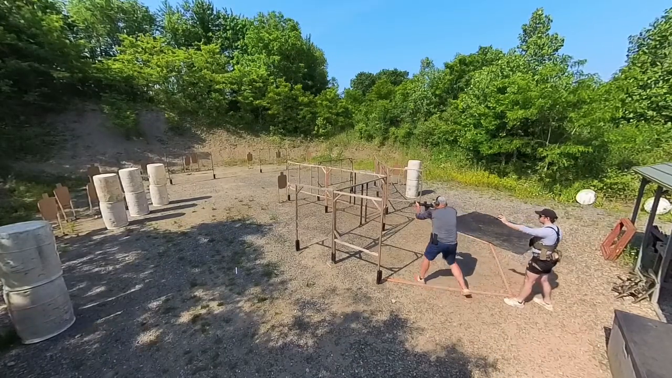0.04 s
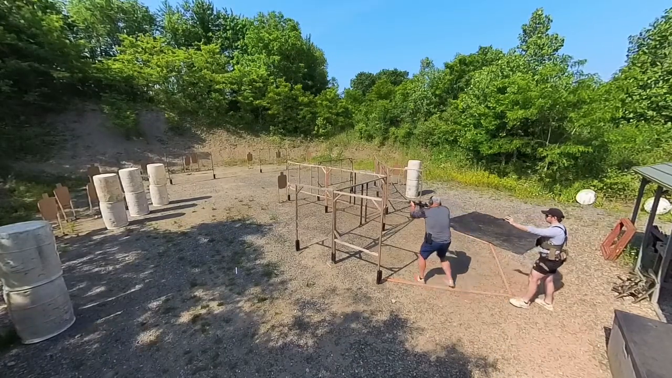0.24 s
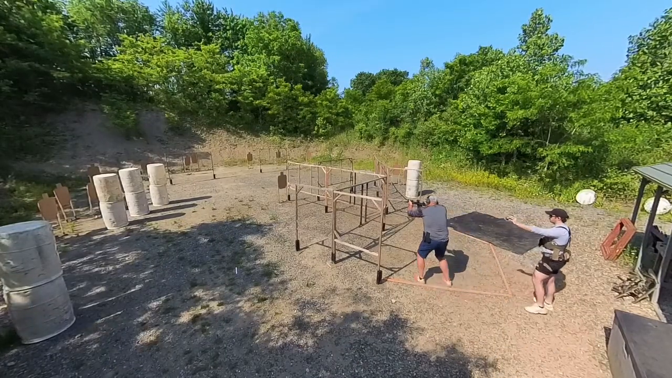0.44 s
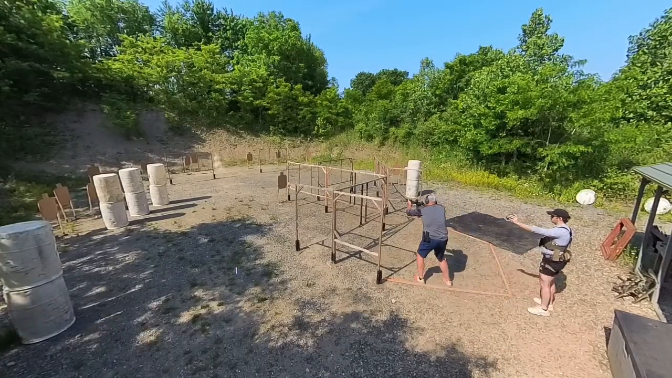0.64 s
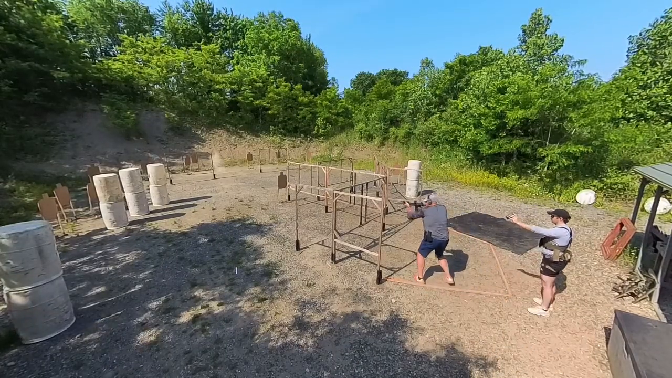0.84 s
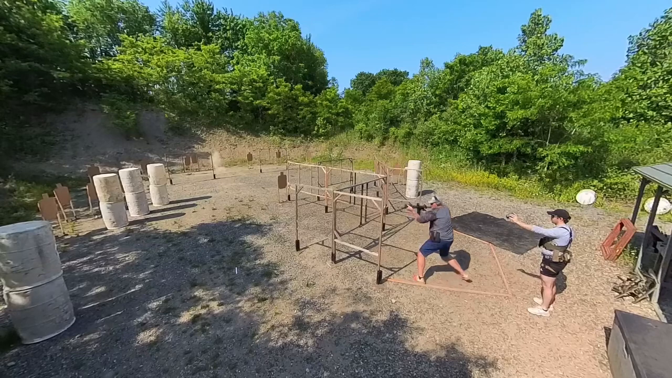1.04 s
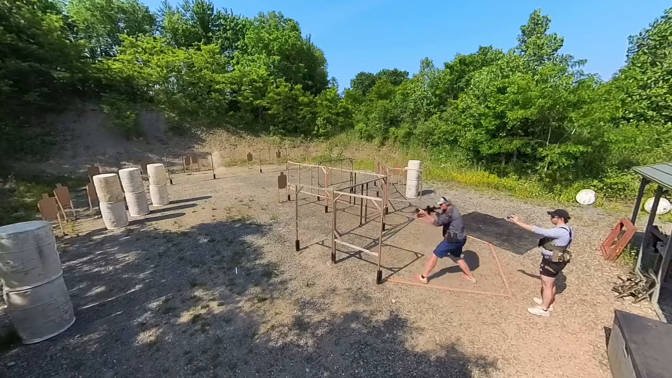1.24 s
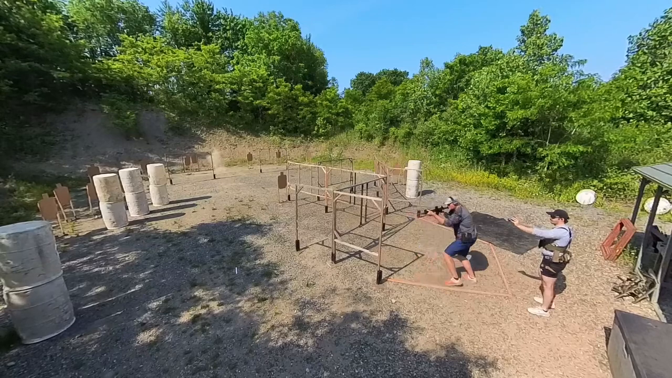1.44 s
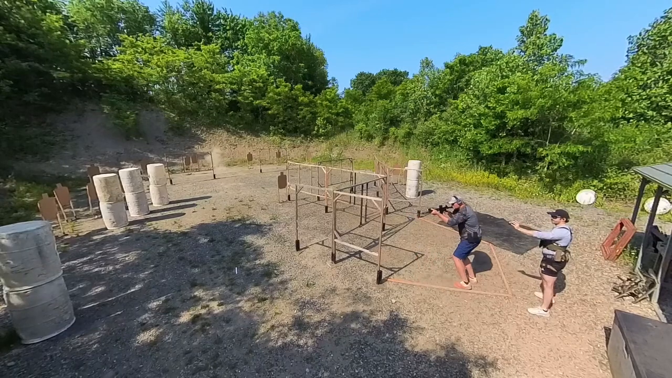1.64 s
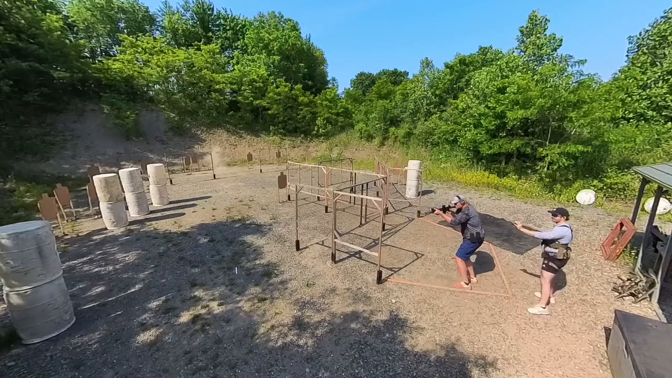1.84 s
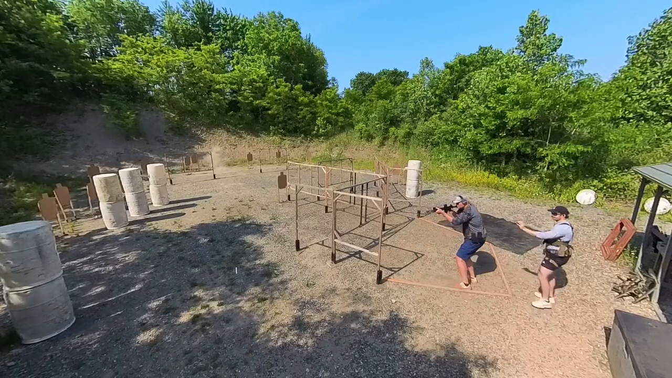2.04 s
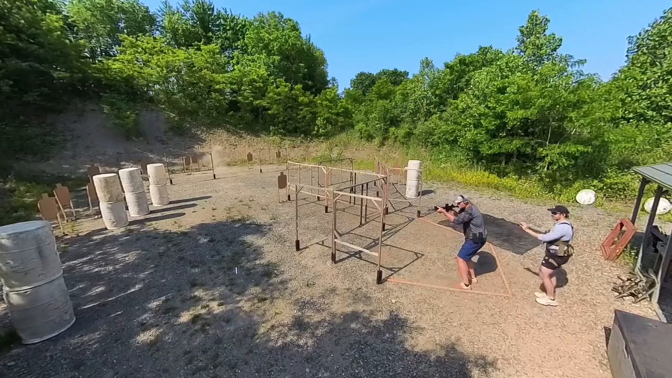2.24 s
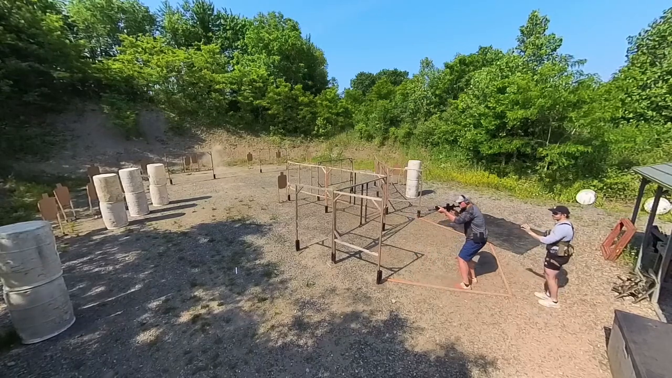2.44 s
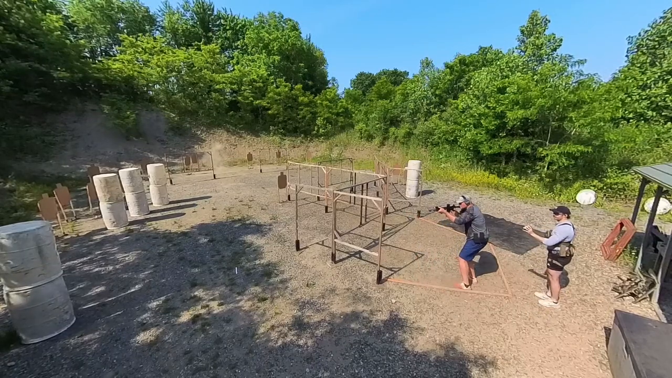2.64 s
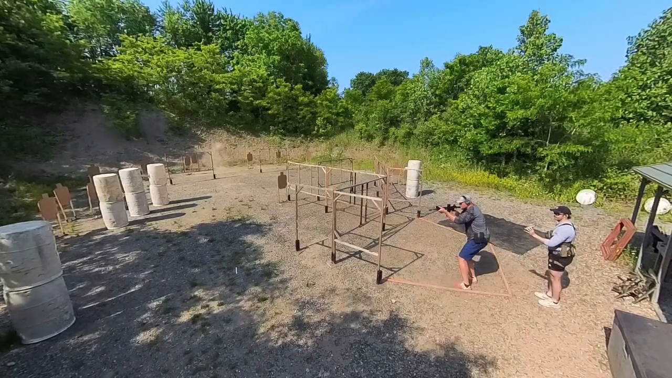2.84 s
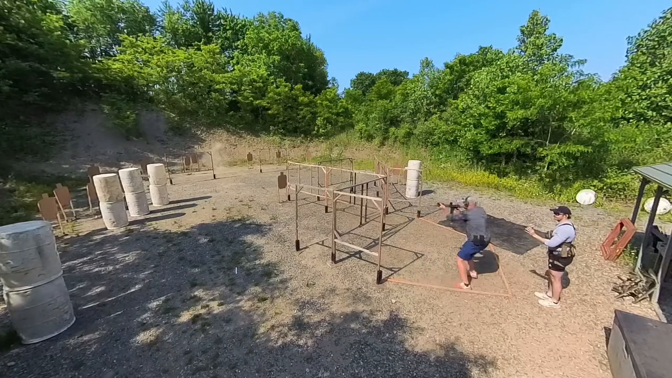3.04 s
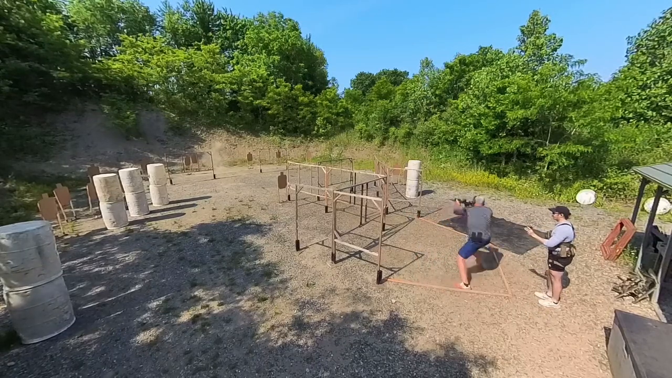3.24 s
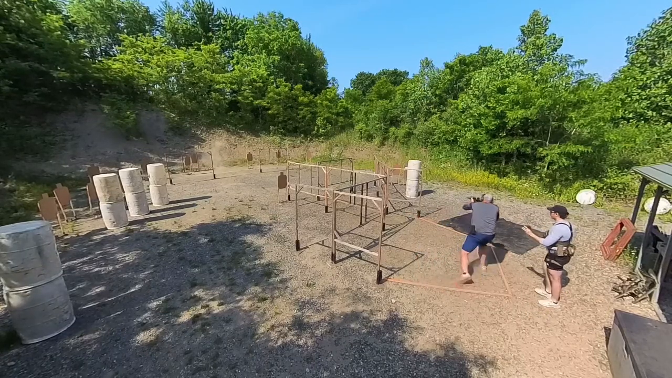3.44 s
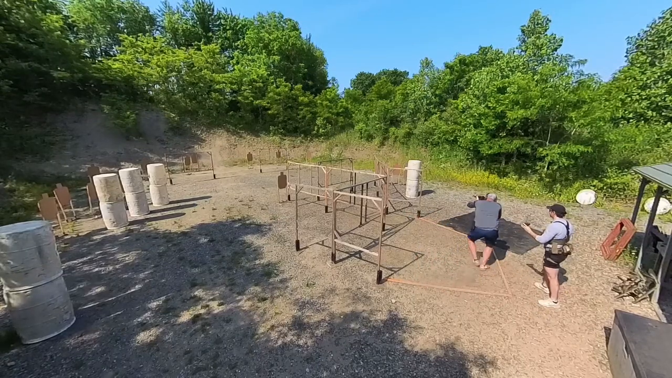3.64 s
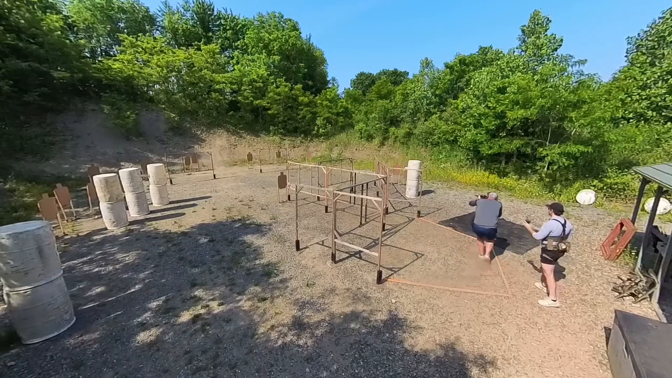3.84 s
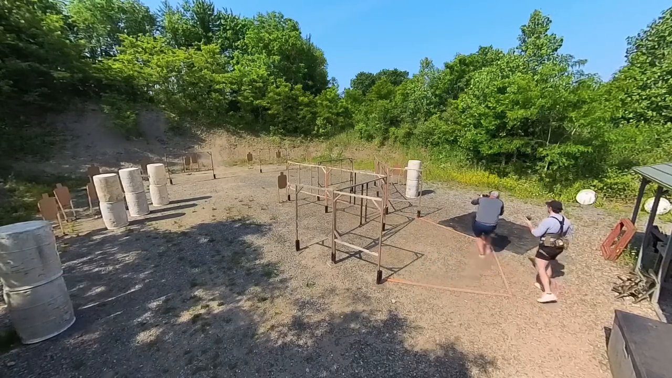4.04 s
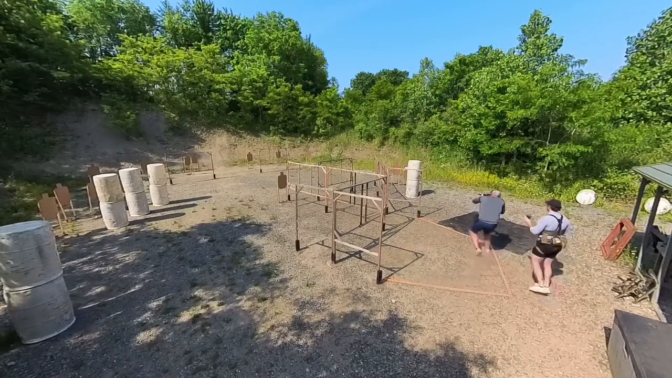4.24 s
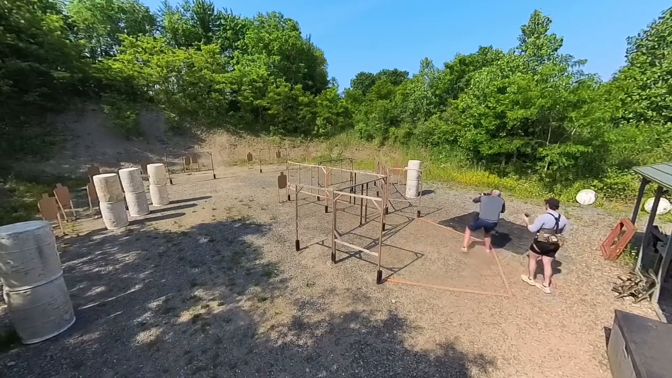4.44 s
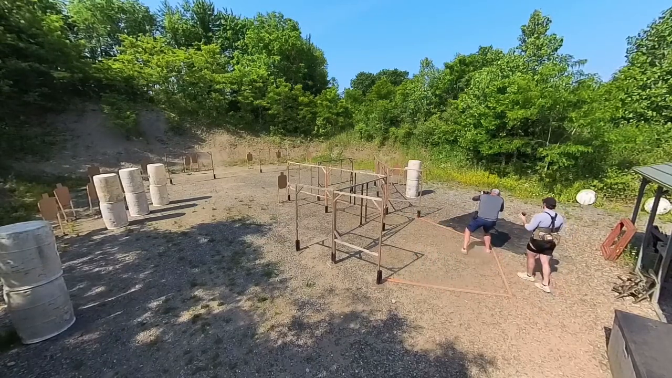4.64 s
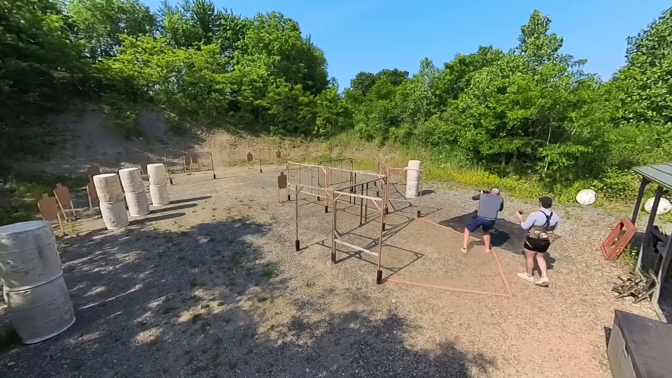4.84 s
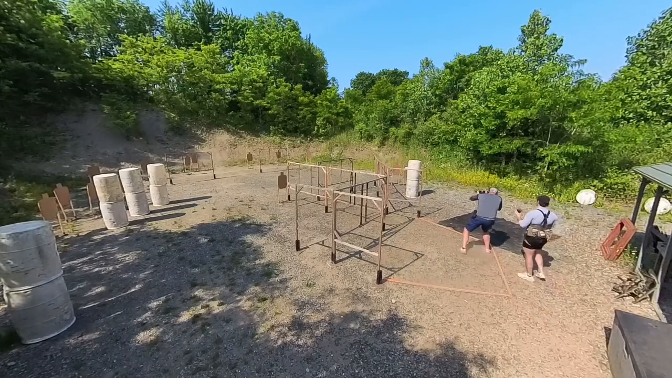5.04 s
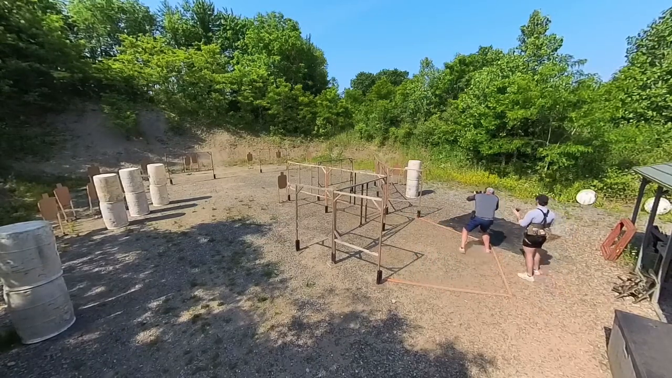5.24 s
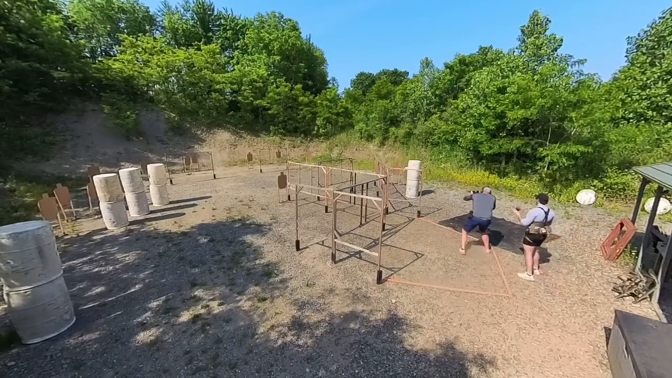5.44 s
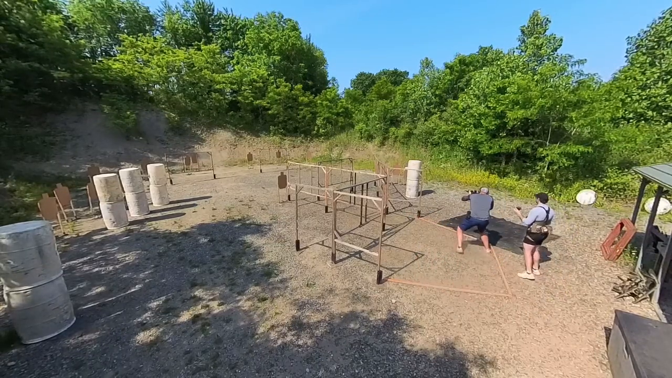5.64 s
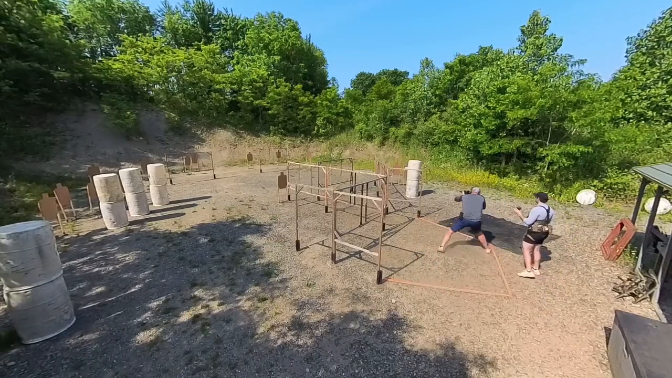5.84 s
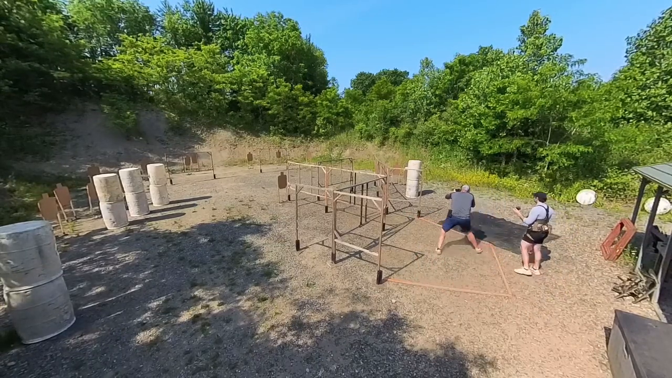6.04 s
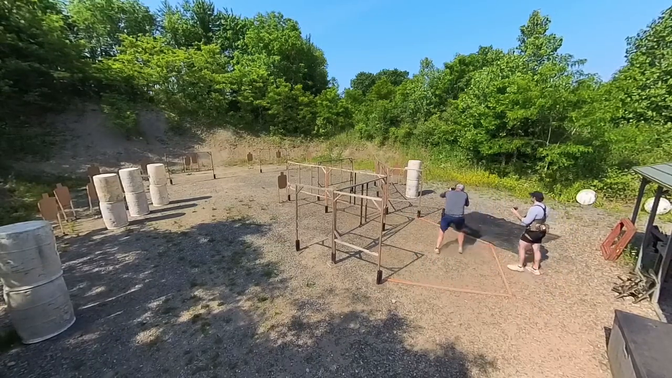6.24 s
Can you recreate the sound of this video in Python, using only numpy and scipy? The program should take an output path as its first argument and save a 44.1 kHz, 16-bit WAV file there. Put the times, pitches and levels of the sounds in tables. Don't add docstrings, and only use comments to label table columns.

```python
import sys
import numpy as np
from scipy import signal
from scipy.fft import rfft, irfft
from scipy.io import wavfile
from scipy.ndimage import uniform_filter1d, minimum_filter1d

SR = 44100
rng = np.random.default_rng(int(sys.argv[2]) if len(sys.argv) > 2 else 0)


def inscribe(sig):
    pcm = np.round(np.clip(np.atleast_2d(sig).T, -1, 1) * 32767)
    wavfile.write(sys.argv[1], SR, pcm.astype(np.int16))


def attenuation_scalar(level_db):
    decades = np.asarray(level_db, float) / 20
    return 10 ** decades


N = 277830

SHOT_S = [.5398, .6905, 1.7611, 1.897, 2.3877, 2.7812, 4.2445, 4.3949, 4.7893, 4.9283, 5.5649, 5.6932]
# push in dB, thump in dB, forerunner in dB.
SHOTS = [(0.5, -24, -16), (0, -11.5, -20), (-1, -17, -24), (5, -13, -30), (0, -16.5, -30),
         (2.5, -13.5, -30), (-2.5, -22, -9), (-1, -17, -8.5), (-1.5, -16, -10), (-3, -16, -12),
         (-1.5, -14, -8), (-3, -15, -13)]
AIM = [0, 0, 1, 1, 1, 1, 2, 2, 2, 2, 2, 2]
# start in seconds, level in dB.
ACTION = [
    (0.525, -40),
    (1.745, -28),
    (2.375, -28),
    (2.765, -33),
]
ACTION_HZ, ACTION_S = 3500, 0.0092
# sign of the push, its length in ms,
# where air and microphone round it in Hz, pitch of the thump in Hz.
PUSH_SIGN = [-1, 1, -1]
PUSH_MS = [.33, .35, .55]
PUSH_TOP_HZ = [2500, 5000, 1600]
THUMP_HZ = [185, 170, 230]
# thump decay by 60 dB in seconds, suction relative to push.
THUMP_T60_S = [.035, .045, .025]
SUCTION = [.8, .6, .9]
FORERUNNER_MS = 1.4
# delay in ms, gain (negative where it returns inverted).
NEAR = [
    [(4.4, .75), (10, .3)],
    [(4.6, -.5), (17, .1)],
    [(3.6, .75), (8.3, .5)],
]
# start in seconds, peak in dB, pitch in Hz.
KNOCKS = [
    (1.793, -13, 136),
    (1.928, -12.5, 154),
    (2.413, -15, 820),
    (2.811, -16, 141),
    (4.458, -11.5, 784),
    (5.0, -12, 800),
    (5.767, -10, 600),
    (6.062, -21, 310),
]
# time in seconds, peak in dB, pitch in Hz.
SLAPS = [(0.5582, 1, 2370), (0.5645, 1, 2540), (0.6059, -1, 2970), (0.6461, 0, 3100), (0.7125, 0, 2710),
         (0.7339, 0, 2540), (0.7606, -1, 1340), (0.8699, -1, 1250), (0.9046, 0, 1420), (1.8006, 1, 2200),
         (1.8064, -1, 3140), (1.8406, -1, 2020), (1.8858, -7, 2110), (1.9255, -4, 4260), (2.0012, 0, 2070),
         (2.0559, -1, 2370), (2.1403, -3, 2200), (2.2273, -13, 2020), (2.4402, -1, 2150), (2.4529, 1, 2840),
         (2.5555, -2, 2200), (2.6114, -7, 2330), (2.6313, 1, 2330), (2.8223, -1, 2280), (2.8675, 0, 2800),
         (2.8774, -1, 2330), (2.9476, 0, 2330), (3.0248, -1, 2410), (4.2624, 1, 1980), (4.2745, -1, 3270),
         (4.3062, -1, 1640), (4.3296, -1, 2110), (4.4233, 0, 2930), (4.4513, -2, 1940), (4.4581, -1, 1720),
         (4.4666, -3, 1890), (4.4793, -3, 2150), (4.4883, 1, 2370), (4.5014, -1, 3790), (4.5327, -1, 2020),
         (4.5788, -3, 1770), (4.8061, 1, 4090), (4.8768, 0, 2110), (4.9993, 0, 2240), (5.0155, -1, 2200),
         (5.0527, -1, 2890), (5.582, 1, 2970), (5.5935, 0, 2800), (5.6386, -1, 1290), (5.6468, -1, 2240),
         (5.6784, -1, 2070), (5.7102, 0, 2070), (5.7217, 0, 1980), (5.7341, -1, 2280), (5.7749, -2, 2630),
         (5.9214, 0, 1850)]
SLAP_DB = -1
# peak time in seconds, level in dB.
GAS = [
    (.562, -20),
    (4.247, -14.5),
    (4.395, -18),
    (4.791, -17),
    (4.928, -21),
    (5.567, -17),
]
GAS_HZ, GAS_RISE_DB_PER_S, GAS_FALL_DB_PER_S = 6800, 3000, 503

# banks in dB, banks' hold in seconds, their treble in dB over mid,
# trees in dB, their low mid in dB over mid.
SWARM = [(-15.5, 0.24, -5, -22.5, 9.5), (-15.5, 0.15, -5, -16.5, -5), (-19.5, 0.083, 3, -20, -3.5),
         (-17, 0.16, 1, -19, -6), (-18, 0.16, 3.5, -19.5, -3.5), (-18, 0.17, 2.5, -18.5, -6),
         (-14, 0.144, -4.5, -20, -14), (-17, 0.19, -3.5, -16, -6.5), (-15.5, 0.15, -4.5, -32, -24),
         (-16.5, 0.17, -4.5, -13.5, -11), (-16, 0.23, -3, -16.5, -33), (-15, 0.17, -4, -15, -8.5)]
# frequency in Hz, density in dB per Hz.
SWARM_COLOUR = [(50, -27.5), (200, -11.5), (500, -10.5), (1000, -2), (1550, -0.5), (1950, 5.5), (2600, 4),
                (3300, 5), (3800, 0.5), (4500, -3), (6000, -7.5), (8000, -3), (9400, -6.5), (9800, -15.5),
                (11400, -30)]
# centre in seconds, swell in dB.
WAVES = [(0.564, 5.5), (.610, 2), (.665, 2), (.712, 3), (0.844, 3.5), (1.803, 1), (1.835, -2.5), (1.867, 6),
         (1.975, 2), (2.01, 1), (2.458, 2), (2.634, 1.5), (2.87, -0.5), (3.026, -2.5), (4.275, -4),
         (4.317, -6.5), (4.426, 3.5), (4.474, -4), (4.505, 2.5), (4.57, 1), (4.848, 3), (4.95, -1),
         (5.06, 0), (5.622, 2), (5.654, -5), (5.755, 1), (5.783, -5.5), (5.92, 0)]
CROSS_HZ = [330, 1100, 5000]
UPPER_HZ = 2700
# level in dB, sag while held in dB/s, extra level as the limiter lets go after the blast in dB.
BANK_DB = [
    [0, 0.56, -18.5, -9.5],
    [0, 1.65, -14.5, -8],
]
BANK_SAG_DB_PER_S = [
    [4.5, 18, 8.9, 132],
    [-1, 31, 5, 93],
]
OPEN_DB = [
    [-17, 1, 14, 3],
    [-42, -13.5, -8, 3],
]
OPEN_S = 0.016
# bank fall in dB/s, tree level in dB, tree fall in dB/s,
# valley level in dB, valley fall in dB/s.
BANK_FALL_DB_PER_S = [193, 136, 90, 60.7]
TREE_DB = [0.5, -17, -6, -45]
TREE_FALL_DB_PER_S = [118, 112, 112, 40]
VALLEY_DB = [-25, -61, -23.5, -51]
VALLEY_FALL_DB_PER_S = [38.1, 31, 47.7, 6.1]
# lead of the banks in seconds, delay of the trees in seconds,
# tree rise in dB/s, relative tree fall, valley level in dB, relative valley fall.
BANK_LEAD_S = [.001, 0, .002]
TREE_S = [0.22, 0.2333, 0.22]
TREE_RISE_DB_PER_S = [600, 2500, 350]
TREE_PACE = [0.93, 1.1, 1.21]
VALLEY_AIM_DB = [2.5, 0.5, 2]
VALLEY_PACE = [0.7, 1, 0.92]
TREE_HOLD_S, TREE_CREST_DB, TREE_CREST_S = 0.03, 1, 0.013
BANK_UPPER_DB, TREE_UPPER_DB, VALLEY_UPPER_DB = -4, -9, 2.5
CLOSE_S = .018

# start in seconds, length in seconds, mid in dB, treble in dB over mid,
# low mid in dB over mid.
BOOTS = [(.005, 0.032, -44.5, -1.5, -2), (0.196, 0.025, -49.5, -6, 5), (4.076, 0.12, -60, 12, -9),
         (0.379, 0.018, -32.5, -15, 2), (0.466, 0.073, -48.5, -17, -9), (.25, .07, -60.5, -2, -10),
         (1.558, 0.036, -43.5, 0.5, 8), (1.623, 0.022, -42.5, 0, 13), (1.692, 0.041, -50.5, 0, -2),
         (3.229, 0.086, -57.5, 13, 14), (3.456, 0.11, -42, -4, -7), (3.534, 0.095, -41.5, -6, 3),
         (3.632, 0.065, -45, -2, 4), (3.71, 0.028, -38.5, -11, -13), (3.92, 0.02, -37.5, -16, -9),
         (3.973, 0.079, -52.5, 7, 3.5), (4.19, 0.049, -48, -12, 4), (6.12, 0.098, -32, -16, -1),
         (6.21, 0.099, -36.5, -1, 7.5)]
# start in seconds, length in seconds, mid in dB, treble in dB over mid,
# low mid in dB over mid.
SCUFFS = [(.09, 0.072, -41.5, -26, -4.5), (1.33, 0.052, -33, -12.5, -11), (1.43, 0.096, -40.5, -8, 11.5),
          (3.40, 0.046, -40, -7, 2.5), (3.785, 0.021, -52, 11, -8), (3.824, 0.035, -31, -8.5, 2),
          (3.90, .02, -43, -9, -15), (6.072, 0.013, -28.5, -14.5, -2.5)]
STEP_RISE_DB_PER_S, SCUFF_RISE_DB_PER_S, STEP_SAG_DB_PER_S, STEP_BASS_DB = 2200, 420, 7, -18.5
# fall of a step in dB/s, quiet of the yard in dB.
STEP_FALL_DB_PER_S = [314, 200, 312, 200]
YARD_DB = [-61.5, -66, -58.5, -60]
# frequency in Hz, density in dB per Hz.
GRAVEL_COLOUR = [(30, -43), (70, -28), (140, 13.5), (330, 8.5), (900, 1.5), (2000, -1), (3400, -10),
                 (4000, -18), (6000, -22.5), (7200, -16), (8600, -8), (9500, -13), (9900, -14),
                 (11400, -19)]
# time in seconds, peak in dB, pitch in Hz.
STONES = [(0.0092, -26, 430), (0.0346, -28, 2760), (0.0874, -30, 780), (0.1023, -31, 990),
          (0.1248, -19, 1460), (0.1531, -28, 730), (0.1729, -26, 1030), (0.2436, -38, 690),
          (0.2538, -39, 1770), (0.2754, -39, 780), (0.3027, -41, 990), (0.3246, -44, 1510),
          (0.399, -16, 950), (0.4682, -32, 2330), (0.4756, -31, 1980), (0.4893, -34, 780),
          (0.5042, -31, 2150), (1.4492, -18, 1210), (1.4639, -18, 1030), (1.4822, -14, 900),
          (1.5715, -23, 650), (1.5925, -23, 1030), (1.6578, -15, 780), (1.7226, -32, 1980),
          (3.3529, -31, 2580), (3.4152, -20, 860), (3.4624, -23, 1550), (3.5545, -23, 1890),
          (3.5823, -24, 2280), (3.6853, -25, 1080), (3.7159, -19, 990), (3.7348, -25, 1080),
          (3.7519, -25, 1890), (3.9248, -23, 2240), (3.9427, -23, 1340), (4.0155, -27, 1030),
          (4.1637, -40, 430), (4.1836, -32, 900), (4.2126, -26, 730), (6.0829, -13, 1160),
          (6.0989, -17, 1680), (6.1167, -16, 1030), (6.1447, -15, 1080), (6.1613, -16, 950),
          (6.1791, -14, 1030), (6.2079, -8, 900), (6.2298, -12, 950), (6.2544, -16, 950),
          (6.2753, -15, 780), (6.2923, -16, 730)]
STONE_DB = -3
# time in seconds, peak in dB, pitch in Hz.
MORE_STONES = [(.3765, -28, 890), (.385, -20, 1490), (.421, -19, 785), (3.8055, -24, 900), (3.816, -21, 1300),
               (3.832, -19, 1000), (3.863, -19, 1100)]
# start in seconds, peak in dB, pitch in Hz.
HEELS = [(3.732, -32, 141), (3.938, -29, 130), (4.039, -37, 159)]

# time in seconds, peak in dB, centre in Hz.
TICKS = [(0.0107, -34, 7020), (0.0348, -22, 8790), (0.1251, -40, 8480), (0.2222, -39, 8570),
         (0.2475, -47, 8310), (0.3811, -33, 8740), (0.4986, -45, 9000), (1.1884, -30, 8570),
         (1.3257, -23, 7150), (1.452, -18, 8570), (1.4909, -35, 7240), (1.5369, -28, 7620),
         (1.571, -23, 8230), (1.5781, -26, 8530), (1.691, -28, 8870), (1.7437, -34, 8050),
         (3.2309, -35, 9040), (3.2674, -31, 6980), (3.3276, -30, 8870), (3.3538, -40, 9000),
         (3.433, -34, 8700), (3.4641, -23, 8270), (3.473, -20, 8350), (3.48, -26, 8350),
         (3.6539, -33, 9300), (3.6696, -33, 8350), (3.7169, -25, 8700), (3.7248, -26, 8790),
         (3.7351, -23, 8350), (3.7518, -26, 7970), (3.7713, -13, 8740), (3.805, -21, 7840),
         (3.967, -34, 8740), (3.9751, -34, 8790), (4.0852, -32, 8790), (4.2245, -38, 8350)]
TICK_DB, RATTLE_DB, RATTLE_T60_S = 0, -16.5, 0.044
# start in seconds, peak in dB, pitch in Hz,
# decay by 60 dB in seconds.
RINGS = [(1.3536, -31, 8900, 0.07), (1.352, -34, 8050, .05), (1.5354, -38, 7370, 0.084),
         (1.59, -14, 8250, 0.06), (1.609, -24.5, 8280, 0.11), (3.1946, -39, 8200, 0.089),
         (3.4002, -39, 8250, 0.099), (3.5544, -35.5, 8570, 0.14), (3.891, -31, 7680, 0.076),
         (4.0128, -40, 7550, 0.12)]
# centre in Hz, width in Hz, level in dB over the level curve.
HUM = [
    (149.3, 15, -5.5),
    (66, 79, -21),
]
# time in seconds, level in dB.
HUM_LEVEL = [(0.0, -49), (0.47, -68), (0.68, -31), (1.09, -69), (1.722, -57), (1.91, -33.5), (2.17, -46.5),
             (4.93, -44.5), (5.37, -49), (5.74, -40), (5.89, -46), (6.09, -58), (6.3, -44)]
# centre in seconds, level in dB.
OVERLOADS = [
    (.5645, -32),
    (2.3875, -43),
    (2.793, -48),
    (4.2445, -44),
    (4.7915, -44),
    (5.562, -60),
    (1.45, -68),
    (3.766, -66),
]
EDGE_HZ = 11350


def rifle():
    out, t = np.zeros(N), np.arange(0, ACTION_S, 1 / SR)
    for s, db in ACTION:
        add(out, s, attenuation_scalar(db) * np.sin(2 * np.pi * ACTION_HZ * t) * signal.windows.tukey(len(t), .4))
    for s, aim, row in zip(SHOT_S, AIM, SHOTS):
        add(out, s - .003, blast(aim, *row))
    for s, db, hz in KNOCKS:
        add(out, s, click(db, hz, cycles=0.58))
    return out + clicks(SLAPS, SLAP_DB, cycles=0.56)


def blast(aim, db, thump_db, forerunner_db):
    t = np.arange(5000) / SR - .003
    u = np.maximum(t + .0001, 0) * 1000 / PUSH_MS[aim]
    pressure = (u > 0) * (1 - SUCTION[aim] * u) * np.exp(-u)
    push = signal.sosfiltfilt(signal.butter(2, PUSH_TOP_HZ[aim], fs=SR, output="sos"), pressure)
    push = push / push.max()
    thump = attenuation_scalar(thump_db - 60 * t / THUMP_T60_S[aim]) * np.sin(2 * np.pi * THUMP_HZ[aim] * t * (1 - 4.5 * t))
    heave = (aim == 1) * attenuation_scalar(-30.5 - 60 * t / 0.5) * np.sin(2 * np.pi * 70 * t)
    rise = np.maximum(1 - np.exp(-t / .001), 0)
    wave = attenuation_scalar(db) * push - thump * attenuation_scalar(3) * rise
    forerunner = attenuation_scalar(forerunner_db) * np.roll(push, -round(FORERUNNER_MS * SR / 1000))
    out = np.concatenate([wave - heave * rise + forerunner, np.zeros(2000)])
    for ms, gain in NEAR[aim]:
        add(out, ms / 1000, gain * wave)
    return PUSH_SIGN[aim] * out


def gas():
    treble = signal.butter(4, GAS_HZ, "high", fs=SR, output="sos")
    hiss = evened(signal.sosfilt(treble, rng.standard_normal(N)))
    t, gain = np.arange(-500, 4000) / SR, np.zeros(N)
    for s, db in GAS:
        add(gain, s + t[0], attenuation_scalar(db + np.minimum(GAS_RISE_DB_PER_S * t, -GAS_FALL_DB_PER_S * t)))
    return gain * hiss


def swarm():
    leaves = evened(grains(per_s=4000, spread_db=2.0, fill=1.5))
    gains = echo_gains()
    near = np.clip(gains[0] / attenuation_scalar(-20), 0, 1)
    arrivals = leaves + attenuation_scalar(-13) * near * trunks(per_s=380, spread_db=2.0, cycles=1.3)
    clumps = patchy(arrivals, depth_db=1.0, frames=5, bins=18.8)
    clumps = patchy(clumps, depth_db=2.0, frames=7, bins=1)
    field = played(clumps, SWARM_COLOUR, gains)
    t, swell_db = np.arange(-2000, 2000) / SR, np.zeros(N)
    for s, db in WAVES:
        add(swell_db, s + t[0], db * np.exp(-(t / 0.011) ** 2))
    return field * attenuation_scalar(swell_db)


def trunks(per_s, spread_db, cycles):
    out = np.zeros(N)
    shapes = [click(0, hz, cycles)[:500] for hz in np.geomspace(1500, 4000, 16)]
    for when, which, size in rng.random((2500, 3))[:round(per_s * N / SR)]:
        add(out, when * N / SR, attenuation_scalar(-spread_db * np.log(size + 0.075)) * shapes[int(which * len(shapes))])
    return evened(out)


def echo_gains():
    power, duck = np.zeros((5, N)), np.ones(N)
    starts = [s - BANK_LEAD_S[aim] for s, aim in zip(SHOT_S, AIM)]
    ends = starts[1:] + [N / SR + 1]
    for s, aim, end, row in zip(starts, AIM, ends, SWARM):
        a, b = round(s * SR), min(round(end * SR), N)
        t = np.arange(min(SR, N - a)) / SR
        power[:, a:a + SR] += trees(t, aim, *row[3:])
        t = np.arange(b - a) / SR
        power[:, a:b] += answer(t, int(aim == 1), aim, *row[:3])
        duck[a:b] = np.clip(np.minimum(t * 1000, (end - s - t) / CLOSE_S), 0, 1)
    power[:, :round(starts[0] * SR)] = 0
    return np.sqrt(power * duck)


def answer(t, front, aim, bank_db, hold, treble_db):
    level_db = bank_db + column(BANK_DB[front]) + column([0, treble_db, 0, 0])
    banks = level_db + column(OPEN_DB[front]) * np.exp(-t / OPEN_S)
    banks -= column(BANK_SAG_DB_PER_S[front]) * np.minimum(t, hold)
    banks -= column(BANK_FALL_DB_PER_S) * np.maximum(t - hold, 0)
    valley = VALLEY_AIM_DB[aim] + column(VALLEY_DB) - VALLEY_PACE[aim] * column(VALLEY_FALL_DB_PER_S) * t
    valley_rise = np.minimum(t / TREE_S[aim], 1) ** 2
    return powers(banks, BANK_UPPER_DB) + powers(valley, VALLEY_UPPER_DB) * valley_rise


def trees(t, aim, db, low_db):
    late = t - TREE_S[aim]
    level_db = db + column(TREE_DB) + column([0, 0, low_db, 0])
    level_db = level_db + TREE_RISE_DB_PER_S[aim] * np.minimum(late, 0)
    level_db += TREE_CREST_DB * np.exp(-abs(late) / TREE_CREST_S)
    fall_db = TREE_PACE[aim] * column(TREE_FALL_DB_PER_S) * np.maximum(late - TREE_HOLD_S, 0)
    return powers(level_db - fall_db, TREE_UPPER_DB)


def boots():
    crunch = patchy(grains(per_s=1000, spread_db=4.5, fill=2.6), depth_db=3.0, frames=6, bins=7)
    out = played(crunch, GRAVEL_COLOUR, step_gains())
    out += clicks(STONES, STONE_DB, cycles=0.63) + clicks(MORE_STONES, 0, cycles=0.62)
    for s, db, hz in HEELS:
        add(out, s, click(db, hz, cycles=0.72))
    return out


def step_gains():
    power = attenuation_scalar(column(YARD_DB)) ** 2 * np.ones(N)
    steps = [(STEP_RISE_DB_PER_S, *row) for row in BOOTS] + [(SCUFF_RISE_DB_PER_S, *row) for row in SCUFFS]
    for rise, s, length, db, treble_db, low_db in steps:
        at = slice(max(round((s - .08) * SR), 0), min(round((s + .5) * SR), N))
        t = np.arange(at.start, at.stop) / SR - s
        shape_db = rise * np.minimum(t, 0) - STEP_SAG_DB_PER_S * np.clip(t, 0, length)
        shape_db = shape_db - column(STEP_FALL_DB_PER_S) * np.maximum(t - length, 0)
        power[:, at] += attenuation_scalar(db + column([0, treble_db, low_db, STEP_BASS_DB]) + shape_db) ** 2
    return np.sqrt(power[[0, 1, 2, 3, 0]])


def brass():
    out, t = clicks(TICKS, TICK_DB, cycles=1.63), np.arange(9000) / SR
    band = signal.butter(2, [7000, 9500], "band", fs=SR, output="sos")
    rattle = evened(signal.sosfilt(band, grains(per_s=1500, spread_db=5, fill=.5)))
    for s, db, hz in TICKS:
        piece = rattle[round(s * SR / 2):][:len(t)]
        add(out, s, attenuation_scalar(db + RATTLE_DB - 60 * t / RATTLE_T60_S) * piece)
    for s, db, hz, t60 in RINGS:
        add(out, s, attenuation_scalar(db - 60 * t / t60) * np.sin(2 * np.pi * hz * t) * (1 - np.exp(-t / 0.00073)))
    return out


def hum():
    hz, noise = np.fft.rfftfreq(N, 1 / SR), rfft(rng.standard_normal(N))
    level = attenuation_scalar(np.interp(np.arange(N) / SR, *np.transpose(HUM_LEVEL)))
    out = np.zeros(N)
    for f, width, db in HUM:
        out += attenuation_scalar(db) * evened(irfft(noise * np.exp(-((hz - f) / width) ** 2), N))
    return level * out


def click(db, hz, cycles):
    u = np.arange(2500) / SR * hz / max(cycles, .2)
    packet = u * np.exp(1 - u) * np.sin(2 * np.pi * u * cycles + rng.uniform(0, 2 * np.pi))
    length = round(4 * SR * cycles / hz)
    packet[:length] -= packet.sum() / min(length, 2500)
    return attenuation_scalar(db) * packet / abs(packet).max()


def clicks(rows, more_db, cycles):
    out = np.zeros(N)
    for s, db, hz in rows:
        add(out, s - cycles / hz, click(db + more_db, hz, cycles))
    return out


def grains(per_s, spread_db, fill):
    size = attenuation_scalar(spread_db * np.minimum(rng.exponential(1, N), 4)) * (rng.random(N) < per_s / SR)
    return evened(size * rng.choice([-1., 1.], N)) + fill * rng.standard_normal(N)


def patchy(x, depth_db, frames, bins):
    z = signal.stft(x, nperseg=256)[2]
    field = uniform_filter1d(rng.standard_normal(z.shape), max(round(frames), 1), 1)
    field = uniform_filter1d(field, max(round(bins), 1), 0)
    return signal.istft(z * attenuation_scalar(depth_db * evened(field)), nperseg=256)[1][:N]


def played(x, colour, gains):
    hz = np.fft.rfftfreq(N, 1 / SR)
    f, db = np.transpose(colour)
    spectrum = rfft(x) * attenuation_scalar(np.interp(np.log(hz + 1), np.log(f + 1), db))
    above = [1 / (1 + (edge / (hz + 1)) ** 6) for edge in CROSS_HZ]
    shares = [above[1] - above[2], above[2], above[0] - above[1], 1 - above[0]]
    bands = [evened(irfft(spectrum * np.sqrt(np.maximum(share, 0)), N)) for share in shares]
    upper = irfft(rfft(bands[0]) / (1 + (UPPER_HZ / (hz + 1)) ** 4), N)
    return sum(gain * band for gain, band in zip(gains, [bands[0] - upper, *bands[1:], upper]))


def column(values):
    return np.array(values, float)[:, None]


def powers(db, upper_db):
    return attenuation_scalar(np.vstack([db, db[0] + upper_db])) ** 2


def evened(x):
    return x / np.sqrt(np.mean(x ** 2) + 1e-20)


def add(mix, s, sound):
    part = mix[round(s * SR):][:len(sound)]
    part += sound[:len(part)]


def scene():
    return (rifle() + swarm() + boots() + brass() + hum() + gas())[None]


def overload():
    t, out = np.arange(-150, 150) / SR, np.zeros(N)
    for s, db in OVERLOADS:
        add(out, s + t[0], attenuation_scalar(db) * np.exp(-(t / .0009) ** 2) * rng.standard_normal(len(t)))
    return signal.sosfiltfilt(signal.butter(6, [11500, 16000], "band", fs=SR, output="sos"), out)


def roll_off(x):
    return signal.sosfilt(signal.butter(12, 16620, fs=SR, output="sos"), x)


def record(dry):
    x = signal.sosfilt(signal.butter(3, 50, "high", fs=SR, output="sos"), dry)
    band = signal.oaconvolve(x, signal.firwin(301, EDGE_HZ, window=("kaiser", 7), fs=SR)[None], "same")
    hz, _, z = signal.stft(band[0], SR, nperseg=1024)
    chance = uniform_filter1d(rng.standard_normal((64, z.shape[1])), 7, 1)[(hz // 350).astype(int)]
    top_power = uniform_filter1d(np.mean(abs(z[180:222]) ** 2, 0), 5)
    top_db = 10 * np.log10(top_power + 1e-14)
    lost = evened(chance) < (hz[:, None] - 10600) / 800 - (top_db + 66) / 22
    z[lost & (hz[:, None] > 9650)] *= attenuation_scalar(-28)
    x = signal.istft(z, SR, nperseg=1024)[1][None, :N]
    room = np.minimum(.99 / (abs(x) + 1e-9), 1)
    limited = x * uniform_filter1d(minimum_filter1d(room, 41), 41)
    return roll_off(limited + overload())


dry = scene()
out = record(dry)
inscribe(out)
```